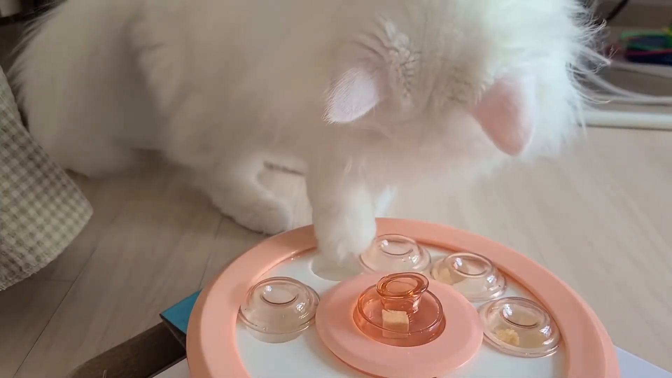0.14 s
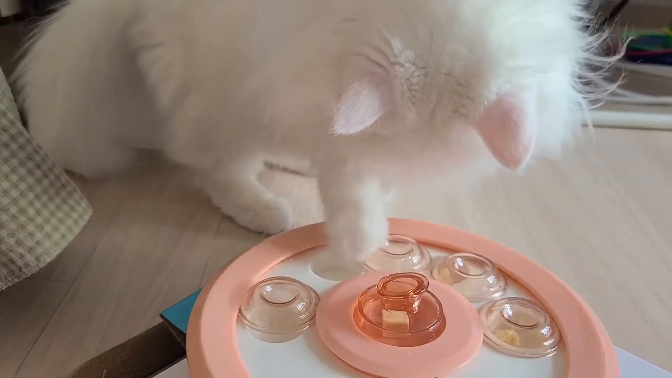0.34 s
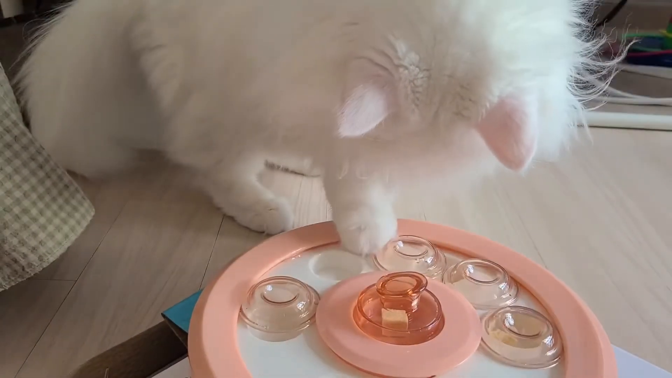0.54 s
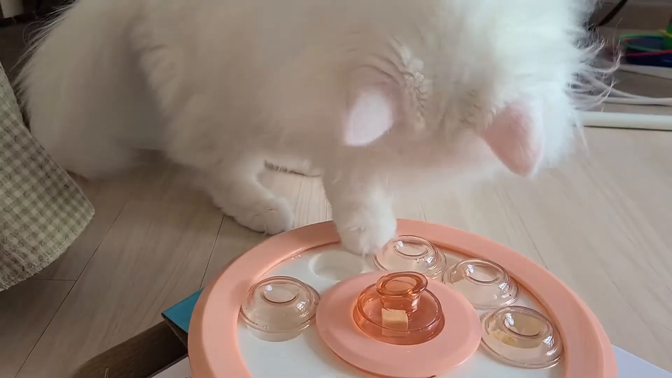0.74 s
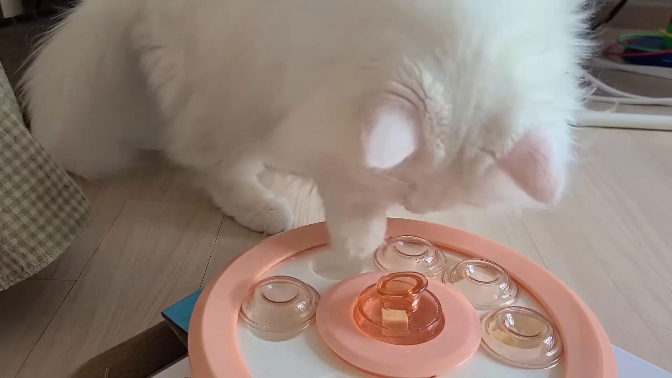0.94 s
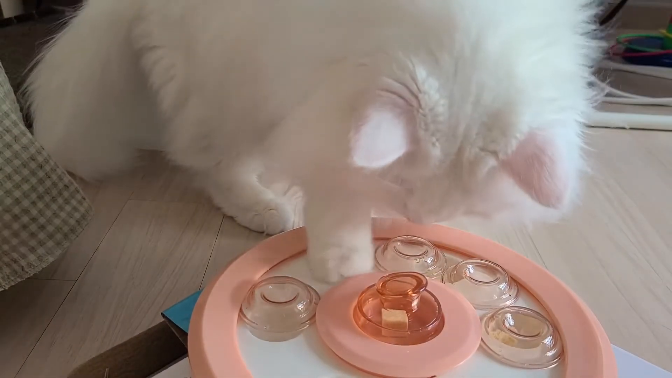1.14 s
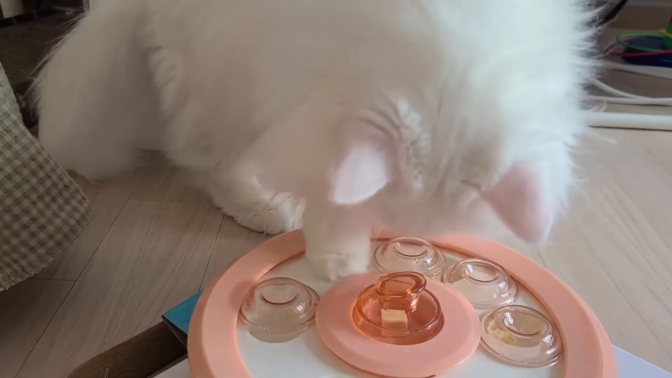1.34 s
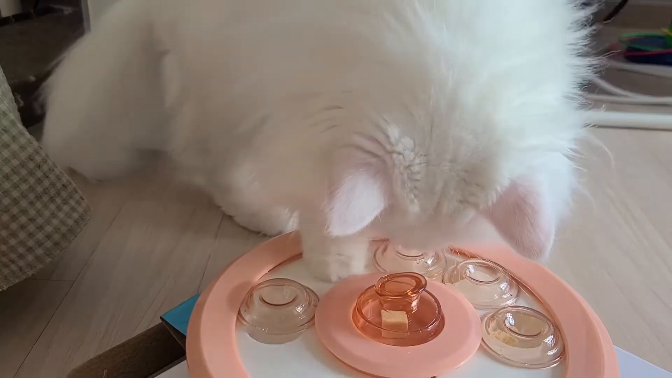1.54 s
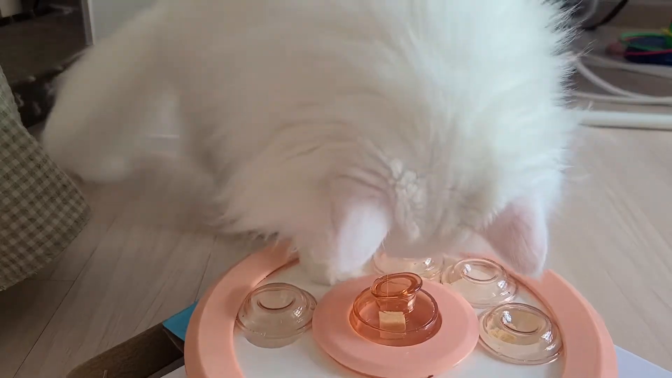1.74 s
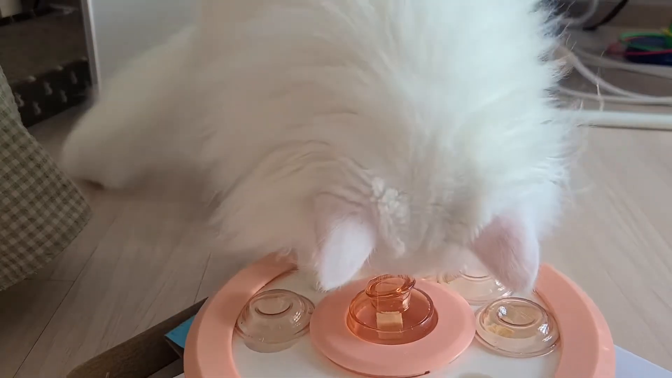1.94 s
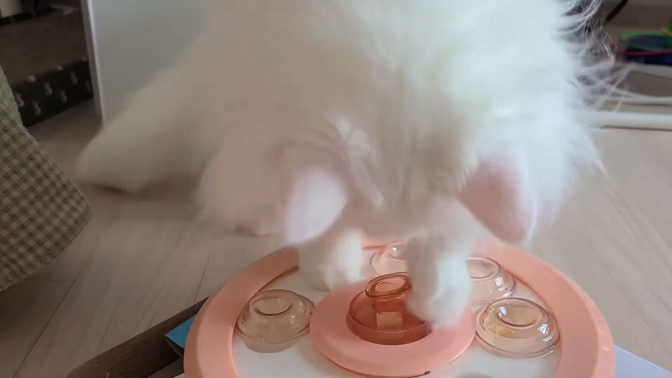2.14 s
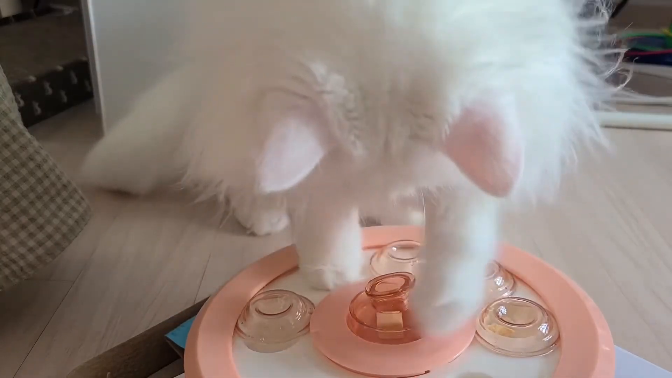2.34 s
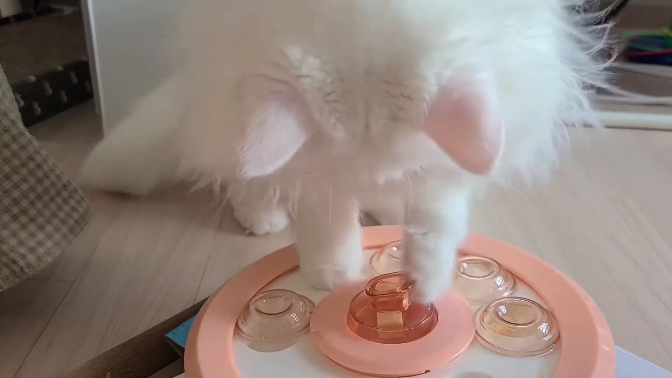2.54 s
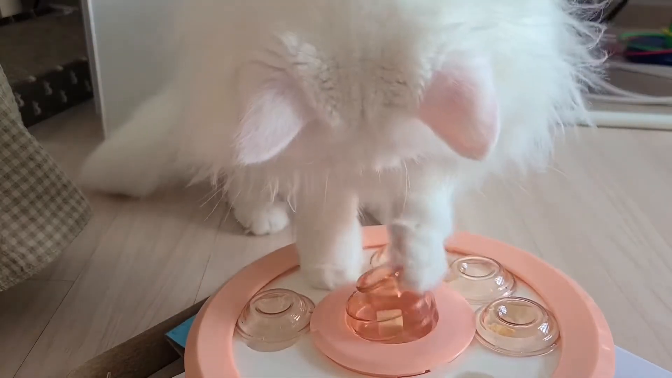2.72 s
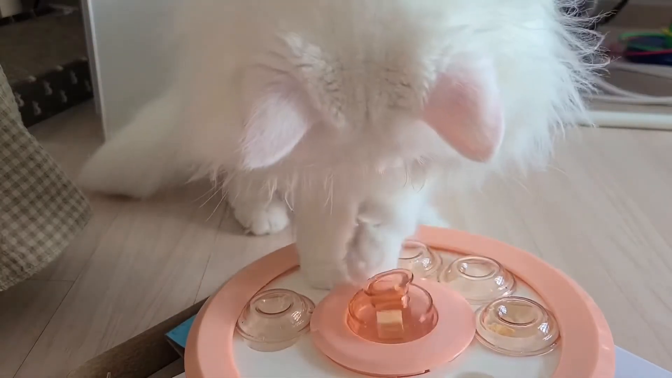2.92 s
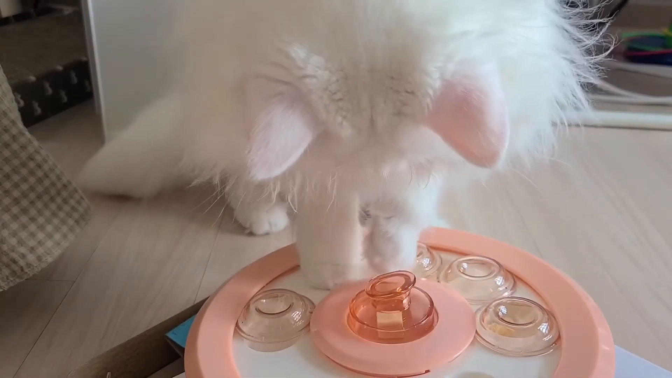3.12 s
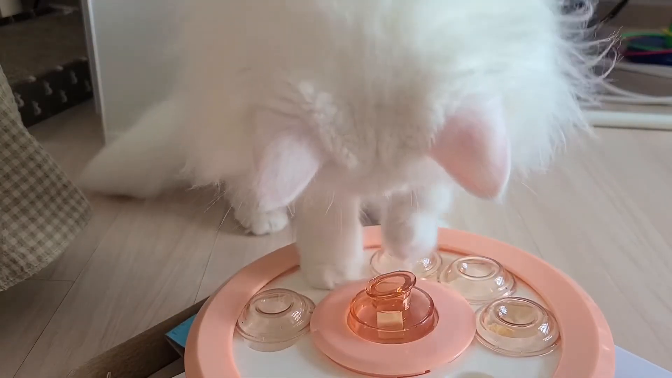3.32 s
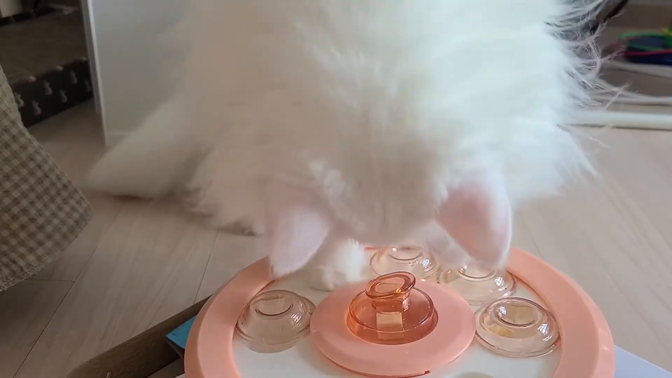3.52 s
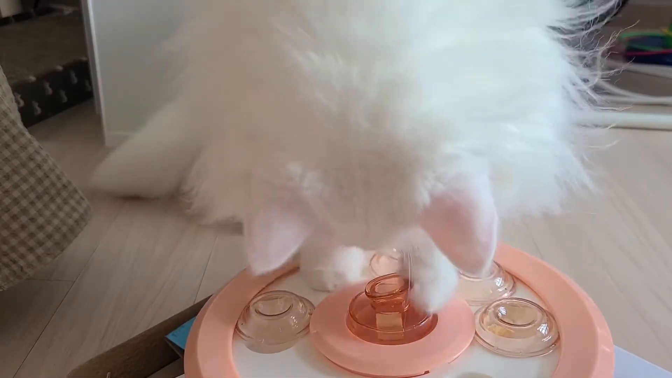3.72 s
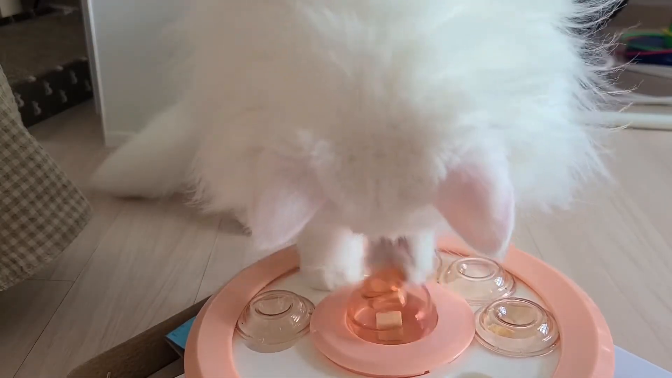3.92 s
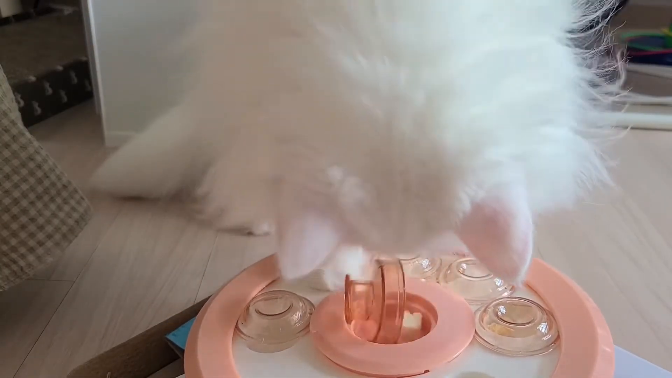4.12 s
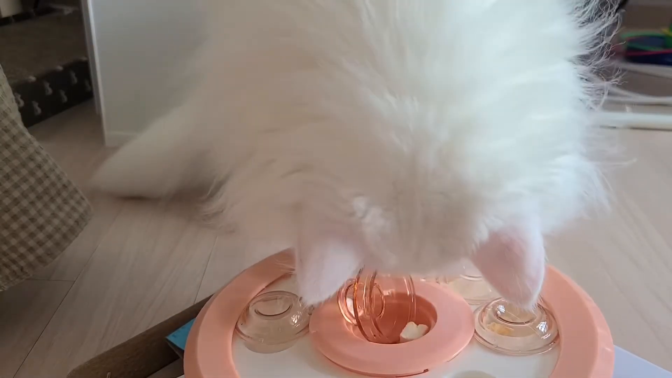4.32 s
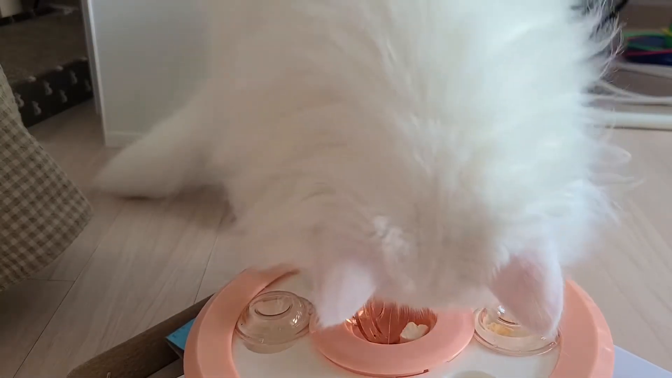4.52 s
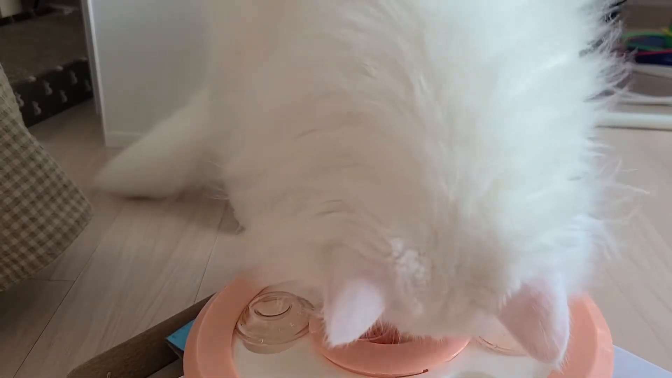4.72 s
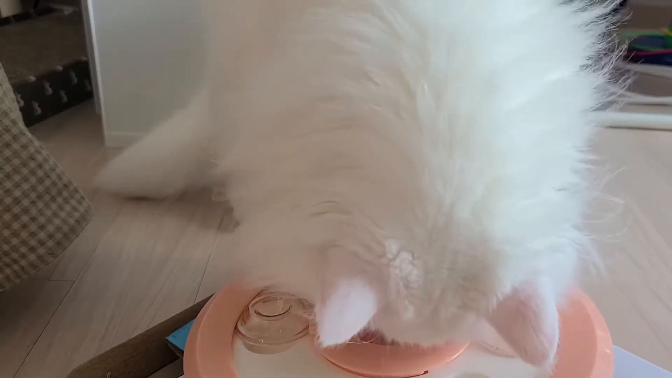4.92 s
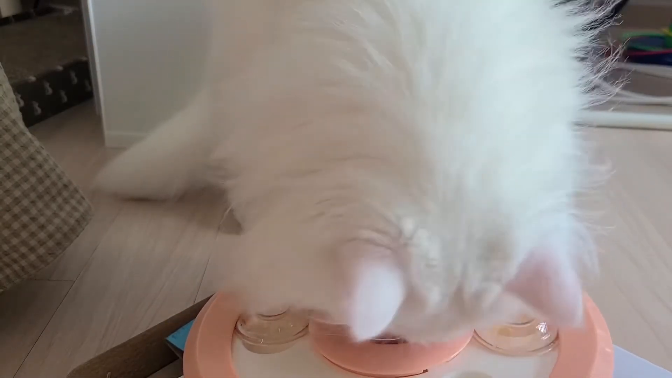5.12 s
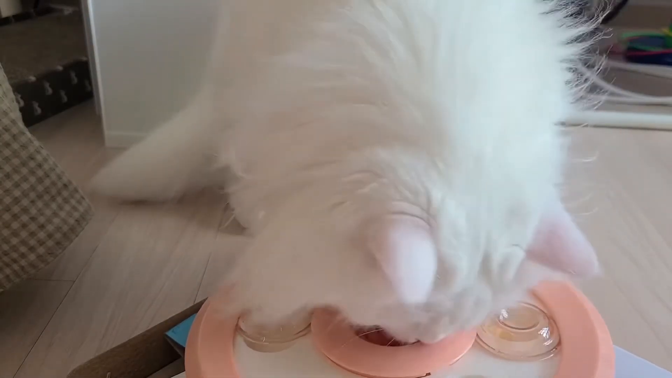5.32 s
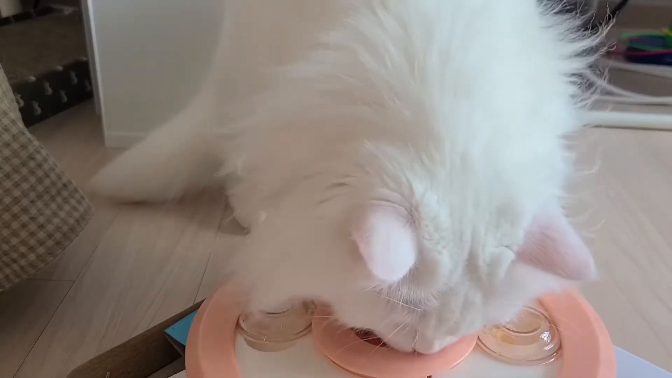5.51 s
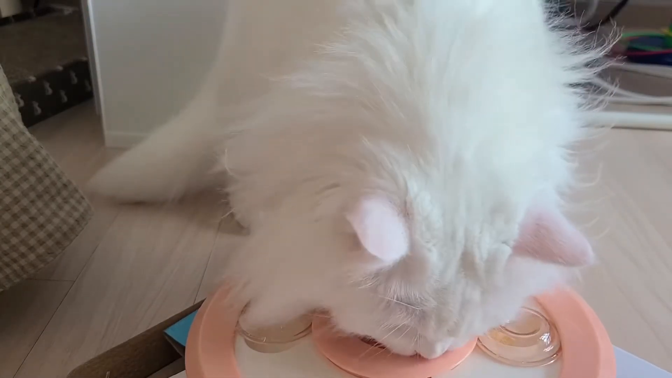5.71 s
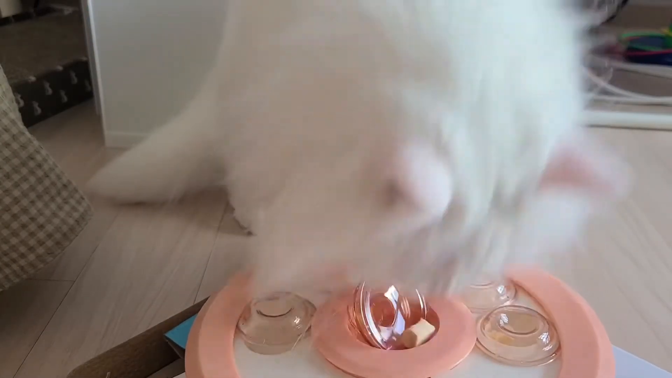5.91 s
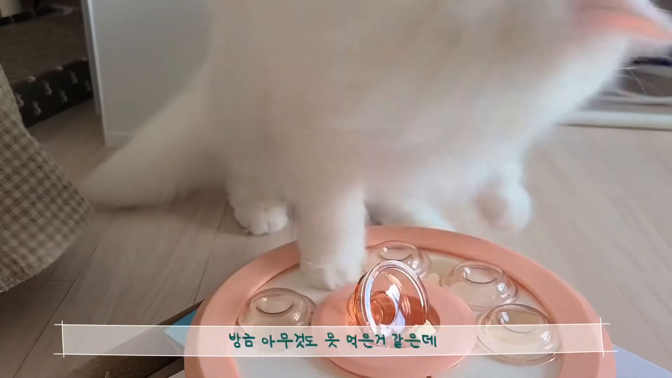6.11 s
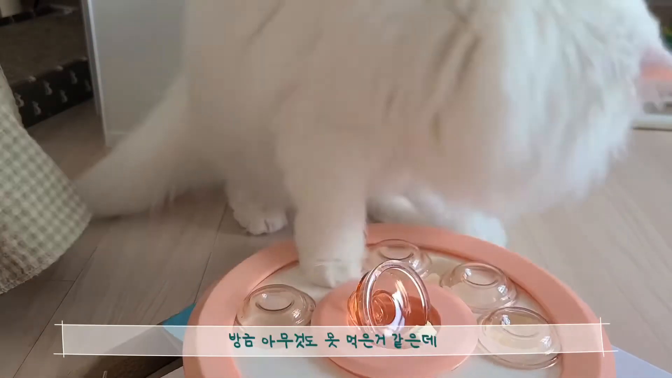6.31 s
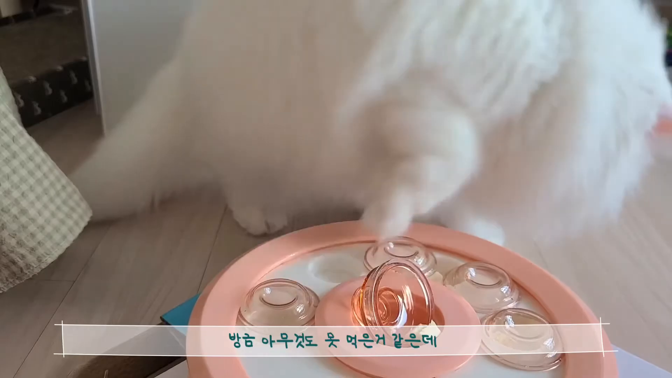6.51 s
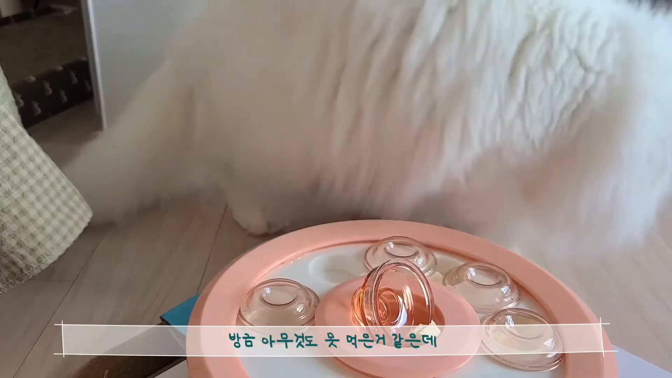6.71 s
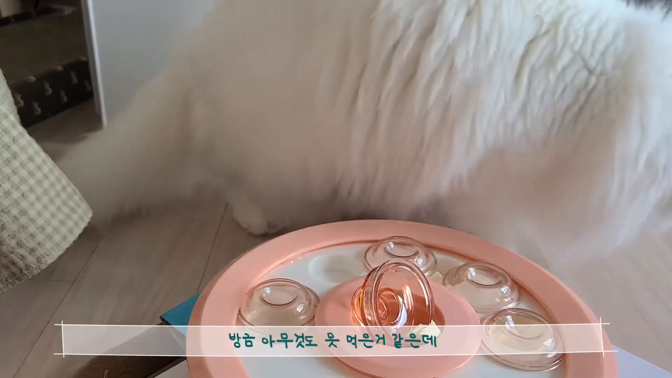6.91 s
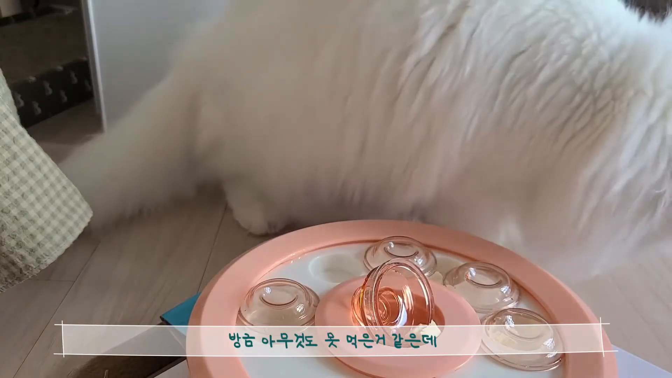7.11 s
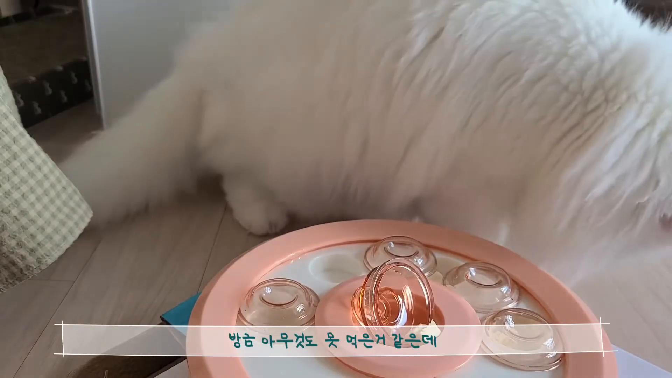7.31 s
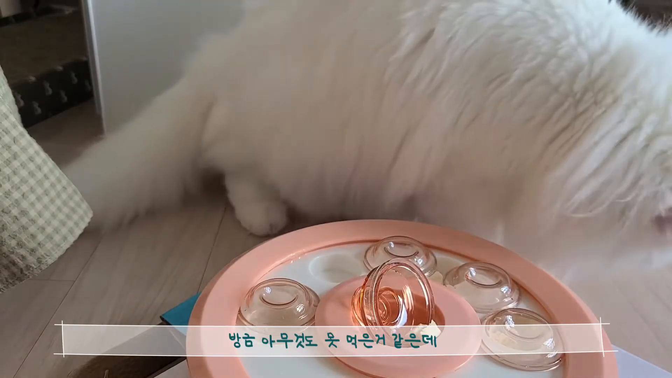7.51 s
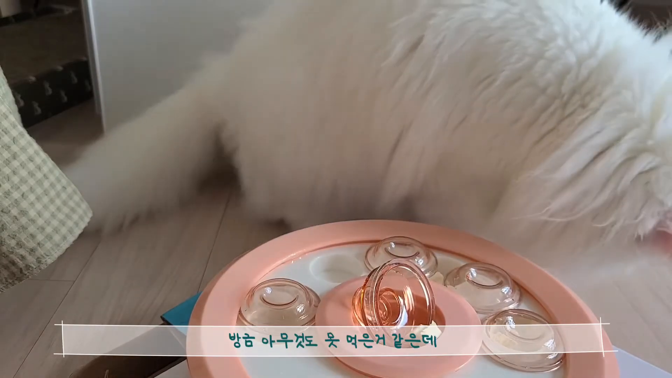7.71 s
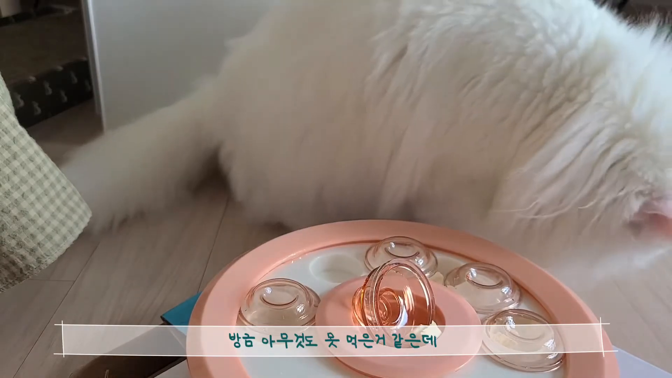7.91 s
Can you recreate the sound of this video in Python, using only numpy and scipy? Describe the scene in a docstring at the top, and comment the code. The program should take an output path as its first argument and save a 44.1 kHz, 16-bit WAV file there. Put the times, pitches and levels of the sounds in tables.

```python
"""A small quiet room with a wooden floor: a cat paws and noses a plastic puzzle feeder close to a phone.
The tray rocks and taps, the domed lid flips over with a rattle, a loose treat ticks, fur brushes the plastic.
Knocks, nudges, claw clicks and scuffs ring one modal shell; ticks are paired sines, paw steps shaped noise.
A short echo made of decaying noise follows, over room noise, faint hum, whines and hiss."""
import sys
import numpy as np
from scipy import signal
from scipy.fft import rfft, irfft, next_fast_len
from scipy.io import wavfile

SR = 44100
rng = np.random.default_rng(int(sys.argv[2]) if len(sys.argv) > 2 else 0)


def master_out(mix):
    """Clip the mix to full scale and print it as 16-bit PCM to the path in sys.argv[1]."""
    frames = np.transpose(np.atleast_2d(mix))
    ceiling = np.clip(frames, -1, 1)
    pcm = np.round(ceiling * 32767).astype(np.int16)
    wavfile.write(sys.argv[1], SR, pcm)


N = 350595  # samples in the scene
RING = 13230  # samples that one contact may ring for
t = np.arange(RING) / SR


def undb(db):
    """Decibels to gain."""
    return 10 ** (np.asarray(db) / 20)


def unit(x):
    """Scale to rms 1."""
    return x / np.sqrt(np.mean(x ** 2))


def fade(t60):
    """Free decay, 60 dB in t60 seconds."""
    return np.exp(-np.log(1000) * t / t60)


def add(out, start_s, x):
    """Mix x into out from start_s, cut off at the end of the scene."""
    i = int(start_s * SR)
    out[:, i:i + x.shape[-1]] += x[..., :N - i]


def colour(x, points):
    """Causal minimum-phase filter through (Hz, dB) points, made by folding the cepstrum."""
    n = 2 * next_fast_len(x.shape[-1] // 2 + RING // 8)
    point_hz, point_db = np.transpose(points)
    bin_hz = np.maximum(np.arange(n // 2 + 1) * SR / n, 1)
    gain = undb(np.interp(np.log(bin_hz), np.log(point_hz), point_db))
    cepstrum = irfft(np.log(gain))
    # doubling the first half and dropping the second gives the causal phase
    cepstrum[1:n // 2] *= 2
    cepstrum[n // 2 + 1:] = 0
    response = np.exp(rfft(cepstrum))
    return irfft(rfft(x, n) * response)[..., :x.shape[-1]]


def pair(n, side):
    """Noise at two microphones: a shared part, plus and minus a part coloured by side (Hz, dB)."""
    mid, diff = rng.standard_normal((2, n))
    signs = np.array([[1], [-1]])
    return unit(mid + signs * colour(diff, side))


def hum(waver=0.22):
    """Mains hum and a distant fan: sines whose level and phase wander slowly."""
    # Each row: frequency in Hz, rms level in dB before the waver.
    hum_tones = [(119.8, -67.5), (180, -80), (274.5, -79), (360, -79.5), (479.5, -80.5)]
    time = np.arange(N) / SR
    knots = np.linspace(0, N / SR, 24)
    out = np.zeros((2, N))
    for hz, db in hum_tones:
        size = np.interp(time, knots, rng.standard_normal(len(knots)))
        drift = np.interp(time, knots, rng.standard_normal(len(knots)))
        lag = np.array([[0], [hz / 600]])  # radians between the two ports
        wave = np.sin(2 * np.pi * hz * time + drift * hz / 300 + lag)
        out += np.sqrt(2) * undb(db) * (1 + waver * size) * wave
    return out


def whines():
    """Faint whines in the room noise: white noise through narrow resonances."""
    # Each row: frequency in Hz, width in Hz, rms level in dB.
    bands = [(860, 49, -76.5), (1114, 25, -82), (1416, 70, -82.5), (2460, 27, -90), (3470, 90, -89),
             (5930, 120, -84), (6830, 48, -84), (7600, 77, -91)]
    out = np.zeros((2, N))
    for hz, width_hz, db in bands:
        b, a = signal.iirpeak(hz, hz / width_hz, fs=SR)
        out += undb(db) * unit(signal.lfilter(b, a, rng.standard_normal((2, N))))
    return out


def background(air_db=-60.0, hiss_db=-75.0):
    """Low room rumble, partly shared by the ports, and separate microphone hiss, with hum and whines."""
    # Colour of the steady room noise. Each row: frequency in Hz, relative level in dB per Hz.
    air_colour = [(20, -10), (50, 6), (90, -4), (135, -4.5), (230, -12.5), (350, -15), (650, -21),
                  (850, -23), (1300, -29.5), (2200, -34), (5000, -40.5), (15000, -53)]
    # Colour of the hiss. Each row: frequency in Hz, relative level in dB per Hz.
    hiss_colour = [(2000, -17.5), (3400, -3.5), (4800, -12.5), (6000, 1), (7600, -0.5), (9000, -17),
                   (10500, -12.5), (12200, -5), (14500, -14.5), (16000, -19.5)]
    air = unit(colour(pair(N, [(60, -19), (200, -13), (600, -2.5), (1500, 1.5)]), air_colour))
    hiss = unit(colour(rng.standard_normal((2, N)), hiss_colour))
    return undb(air_db) * air + undb(hiss_db) * hiss + hum() + whines()


def room(x, echo_db=-7.5, t60_low=0.23, t60_high=.24, build_s=0.0059, early_db=-7.5, early_t60=0.051):
    """Floor and furniture answer first as sparse reflections; the walls' decaying noise builds up after."""
    # Colour of the echo from floor and walls. Each row: frequency in Hz, gain in dB.
    walls = [(100, -11), (200, 9), (450, 3.5), (800, 4.5), (1400, -7), (2500, -6.5), (5000, -3),
             (9000, -2.5), (15000, -2)]
    noise = pair(RING, [(150, -17.5), (500, -6), (1200, 3), (3000, 4.0)])
    low = signal.sosfilt(signal.butter(2, 1800, fs=SR, output="sos"), noise)
    high = signal.sosfilt(signal.butter(2, 1800, "high", fs=SR, output="sos"), noise)
    build = 1 - np.exp(-(t / build_s) ** 2)
    late = (low * fade(t60_low) - high * fade(t60_high)) * build
    sparse = (rng.random(RING) < .04) * (t > .002)  # nothing in the first 2 ms
    near = pair(RING, [(300, -3.5), (2000, -7.5)]) * sparse * fade(early_t60)
    echo = (undb(echo_db) * unit(late) + undb(early_db) * unit(near)) / np.sqrt(RING)
    return x + signal.fftconvolve(x, colour(echo, walls), axes=1)[:, :N]


def upper_modes(t60, count=70):
    """The dense high modes that one contact happens to excite; the highest fade first."""
    place, size, phase, side = rng.random((4, count, 1))
    hz = 1000 + 14000 * (np.arange(count)[:, None] + place) / count
    u = t[:RING // 4]
    # t60 holds at 3 kHz
    rings = size * np.exp(-np.log(1000) * u / t60 * (hz / 3000) ** .3)
    lag = (side - .5) * np.minimum(hz / 1200, np.pi)
    ports = [(rings * np.sin(2 * np.pi * (hz * u + phase) + e * lag)).sum(0) for e in (1, -1)]
    return np.pad(np.array(ports), [(0, 0), (0, RING - len(u))])


def shell(spot_hz=1450, over_hz=2500, spot_db=1.0, over_db=-9.5, spot_t60=.018, over_t60=0.029,
          vary_db=1.14, detune=.012, ear_db=1.02, crack_db=-5.5, crack_t60=0.0095,
          upper_db=-7.5, upper_t60=0.031, contact_s=0.00052):
    """One contact: a crack, two brief tones of the struck spot and the shell's modes, weighted anew."""
    # The shell, damped by paw and floor, with a few longer rings.
    # Each row: frequency in Hz, level in dB, t60 in seconds.
    modes = [(367, -22, 0.019), (446.2, -21.5, .13), (498, -10, 0.041), (502.7, -23.5, .15),
             (745, -15.5, 0.046), (845, -6, 0.027), (1060, -17.5, 0.11), (1143, -15, 0.12),
             (1165, -5.5, 0.017), (1405, -22.5, .16), (1451, 0.5, 0.02), (1550, -22, 0.12),
             (1610, -21.5, .15), (1770, -2.5, .02), (1894, -13, 0.046), (2080, -10, 0.011),
             (2510, -8, 0.018), (2608, -22, 0.1), (3240, -15.5, 0.039), (3930, -17.5, .02),
             (4843, -23, 0.014), (5590, -21, 0.016), (7300, -28.5, .025), (8457, -33, 0.021)]
    # Colour of the crack and the dense upper modes at contact. Each row: frequency in Hz, gain in dB.
    crack_colour = [(30, -56), (110, -25.5), (185, -9), (280, -16.5), (460, -4), (700, -4), (1500, 3.5),
                    (2100, -7.5), (3200, -8), (5000, -15.5), (8000, -23.5), (10000, -29.5), (13500, -31),
                    (16000, -39)]
    over_level_db = over_db - 20 * np.log10(over_hz / 2000)
    spot = [(spot_hz, spot_db, spot_t60), (over_hz, over_level_db, over_t60)]
    hz, db, t60 = np.transpose(list(modes) + spot)[:, :, None]
    share, bend, side, phase = rng.standard_normal((4, len(hz), 1))
    # the paw's grip shifts the broad, damped modes more than the long rings
    swing = 2 * np.pi * hz * (1 + detune * bend * t60.min() / t60) * t
    rings = undb(db + vary_db * share) * fade(t60)
    # short waves reach the two ports unequally
    side = side * np.minimum(hz / 1500, 2)
    ports = []
    for e in (1, -1):
        wave = np.sin(swing + phase + e * 0.45 * side)
        ports.append((rings * undb(e * ear_db * side) * wave).sum(0))
    body = np.array(ports)
    burst = pair(RING, [(300, -11.5), (1500, -0.5), (4000, 0.5)]) * fade(crack_t60)
    crack = colour(burst, crack_colour)
    upper = colour(upper_modes(upper_t60), crack_colour)
    onset = 1 - np.exp(-t / contact_s)
    return (unit(body) + undb(crack_db) * unit(crack) + undb(upper_db) * unit(upper)) * onset


def contact(spot_hz, weight_db, edge_db, attack_s=.007, free_t60=1.0):
    """One blow, levelled over its attack; weight thumps through tray and floor, a hard edge adds treble."""
    snap_db = 5 + 1.2 * edge_db  # the top snap grows with the hardness of the edge
    tone = [(40, -18.5), (150, .3 * weight_db), (280, 0.59 * weight_db - 3), (420, 0.91 * weight_db + 1.0),
            (700, 0.5 * weight_db), (1300, 0), (2300, -0.04),
            (4200, edge_db - 1.5), (5500, edge_db + 1.5), (7500, edge_db), (11000, snap_db)]
    # second tone of the struck spot, scattered by .14 octave
    over_hz = 2388 * 2 ** (.14 * rng.standard_normal())
    # a paw leaning on the toy damps its ring
    hit = shell(spot_hz, over_hz) * fade(free_t60 * undb(-weight_db))
    attack_rms = np.sqrt(np.mean(hit[:, :int(attack_s * SR)] ** 2))
    return colour(hit / attack_rms, tone)


def scuffs(slips_per_s=900, scatter_db=5.0):
    """Paw and fur drag over the toy: tiny uneven slips swell and die away, each one tapping the shell."""
    # Each row: start in seconds, length in seconds, level in dB before brightening, brightness in dB.
    drags = [(1.049, 0.343, -82.5, 13), (1.738, 0.083, -70.5, 8.5), (1.869, 0.0052, -41.5, -2),
             (2.582, 0.0085, -53.5, -32), (2.88, 0.0081, -42.5, -12), (2.901, 0.042, -37.5, -13.5),
             (3.633, 0.025, -63, -4), (3.963, 0.034, -55, -22.5), (5.614, 0.046, -69, 11.5),
             (5.715, 0.06, -70, 5.5), (6.162, 0.0719, -68, 9.5), (6.369, 0.0107, -54, -5),
             (6.401, 0.022, -57, 1), (7.629, 0.048, -65, 8)]
    out = np.zeros((2, N))
    for start_s, length_s, db, bright_db in drags:
        n = int(length_s * SR)
        count = int(length_s * slips_per_s) + 2
        slips = np.zeros(n)
        sizes = undb(scatter_db * rng.standard_normal(count))
        slips[rng.integers(1, n - 1, count)] = sizes * rng.choice([-1, 1], count)
        swell = np.hanning(n) ** .5
        rub = signal.fftconvolve(shell(), (slips * swell)[None], axes=1)
        rub = rub / np.sqrt(np.sum(rub ** 2) / (2 * n))
        add(out, start_s, undb(db) * colour(rub, [(1500, 0.00048), (5000, bright_db)]))
    return out


def steps(t60=0.13, press_s=0.0017):
    """A padded paw set down on tray or floor gives a slow, dull thud of shaped noise."""
    # Each row: start in seconds, level in dB before the envelope, pitch in Hz.
    paws = [(1.772, -55.5, 377), (1.875, -50, 420), (2.891, -49, 187.3), (5.11, -47, 183.3),
            (5.86, -43.5, 193.6), (6.387, -39, 397), (7.303, -63.5, 550), (7.655, -57, 618)]
    out = np.zeros((2, N))
    envelope = fade(t60) * (1 - np.exp(-t / press_s))
    for start_s, db, hz in paws:
        shape = [(hz / 3, -30), (hz * .8, -5), (hz, 0), (hz * 1.25, -8), (hz * 2.5, -18), (hz * 8, -50)]
        thud = unit(colour(rng.standard_normal(RING), shape))
        add(out, start_s, undb(db) * thud * envelope)
    return out


def ticks():
    """A small hard piece, treat or lid, rings in a close pair of high modes."""
    # Each row: start in seconds, frequency in Hz, level in dB, t60 in seconds.
    pieces = [(0.3427, 8160, -36, 0.037), (1.875, 3830, -46, 0.016), (2.109, 3640, -60.5, .03),
              (2.111, 2300, -58.5, .025), (2.706, 5300, -65, .025), (2.889, 5960, -50.5, .05),
              (2.992, 10350, -69.5, 0.023), (3.958, 5520, -54, .06), (4.008, 3710, -33.5, 0.018),
              (4.074, 5494, -24.5, .04), (4.711, 4950, -48, 0.021), (5.079, 4950, -46.5, .022),
              (5.112, 4700, -45, 0.03), (5.859, 3112, -44, 0.064)]
    out = np.zeros((2, N))
    for start_s, hz, db, t60 in pieces:
        phase = rng.uniform(0, 2 * np.pi, (2, 1))
        first = np.sin(2 * np.pi * hz * t) * fade(t60)
        second = 0.54 * np.sin(2 * np.pi * hz * 1.04 * t + phase) * fade(t60 / 2)
        add(out, start_s, undb(db) * (first + second))
    return out


def claws():
    """A claw tip catches the plastic: a light, hard contact gives a thin, bright click."""
    # Each row: start in seconds, level in dB before the contact's tone.
    catches = [(0.323, -54.5), (1.722, -75.5), (1.819, -74.5), (2.706, -73), (5.703, -75), (7.627, -65.5)]
    out = np.zeros((2, N))
    for start_s, db in catches:
        add(out, start_s, undb(db) * contact(spot_hz=1190, weight_db=-1, edge_db=22.5))
    return out


def nudges(count=3, spot_hz=850, weight_db=17.5):
    """Low, heavy, quiet pushes of tray against floor, and count fainter stirs in each resting stretch."""
    # Each row: start in seconds, level in dB before the contact's tone, edge hardness in dB.
    pushes = [(0.239, -54, 8.5), (0.812, -56.5, 6), (0.8337, -55, 7.5), (1.264, -62.5, 4),
              (1.535, -66.5, 2), (1.778, -59, 7.5), (2.589, -54.5, 1.5), (3.939, -56.5, -10.5),
              (4.65, -62, -7), (4.711, -55.5, 7), (5.007, -54.5, -19), (5.288, -65, -2.5),
              (6.254, -62, 8.5)]
    # Stretches in which a resting paw keeps the tray stirring. Each row: start and end in seconds.
    stretches = [(1.0, 1.85), (3.6, 3.95), (5.2, 5.8)]
    out = np.zeros((2, N))
    for start_s, db, edge_db in pushes:
        add(out, start_s, undb(db) * contact(spot_hz, weight_db, edge_db))
    for begin_s, end_s in stretches:
        for start_s in rng.uniform(begin_s, end_s, count):
            stir_db = -67.5 + 2.5 * rng.standard_normal()
            add(out, start_s, undb(stir_db) * contact(spot_hz, weight_db, edge_db=1.5))
    return out


def knocks():
    """Lid and tray knock together, plastic on plastic, at spots of differing pitch."""
    # Each row: start in seconds, level in dB before the contact's tone, pitch of the struck spot in Hz,
    # weight behind it in dB, edge hardness in dB.
    blows = [(0.329, -34, 1170, 2.5, 2.5), (0.342, -23, 1448, -9.5, 3.5), (0.3521, -32.5, 1370, 0, 8.5),
             (1.8748, -40.5, 950, 12.5, -2), (1.896, -48, 1850, -3, -22), (2.641, -50, 1130, 4, -17),
             (2.671, -47, 860, 3, -25), (2.89, -25, 1530, -6, -8.5), (2.9437, -34, 1455, -10, -12),
             (2.97, -41.5, 1160, 1, -10), (2.9923, -36.5, 1420, -2.5, -11.5), (3.001, -37.5, 1560, 5, -5.5),
             (3.985, -47.5, 1120, 14, -12), (4.0025, -40.5, 1580, 9, -5), (4.008, -23, 1490, -3, -8),
             (4.0495, -29.5, 1510, -1, -10.5), (4.065, -31.5, 1480, 3.5, 0), (4.074, -10, 1520, -6.5, 3),
             (4.1035, -17, 1430, -7, -9), (4.115, -27.5, 1160, 8, -3), (4.188, -37, 1070, 6.5, -6),
             (4.193, -28.5, 930, 1.5, -3.5), (4.227, -26, 1480, 4.5, 4), (4.2411, -22.5, 1182, 1.5, 0.5),
             (4.8796, -42, 1120, -12, 1.5), (4.891, -48.5, 1830, -9.5, -4), (5.081, -51.5, 930, 12, 7),
             (5.1063, -42.5, 1750, 10.5, 0), (5.112, -34, 1450, 5, -2), (5.168, -53, 1447, 4.5, -5),
             (5.852, -45, 1490, 9, -6), (5.8586, -34, 1625, 9, -1), (5.864, -35, 1130, 12.5, -6.5),
             (5.871, -34.5, 1140, -7.5, -5), (5.8852, -33, 1190, 2.5, -4), (6.383, -34.5, 1282, 11, 3.5),
             (6.398, -44, 1233, 7.5, 11)]
    out = np.zeros((2, N))
    for start_s, db, spot_hz, weight_db, edge_db in blows:
        add(out, start_s, undb(db) * contact(spot_hz, weight_db, edge_db))
    return out


def scene():
    """The toy in its room, heard up close through two slightly unlike ports, over the background."""
    # How the two microphone ports hear the toy. Each row: frequency in Hz, left minus right in dB.
    ports = [(120, -2), (350, 0), (700, 1.5), (1400, -0.5), (2800, -2), (5600, -3.5), (10000, -1),
             (14000, -3)]
    toy = room(scuffs() + steps() + ticks() + claws() + nudges() + knocks())
    heard = []
    for x, e in zip(toy, (1, -1)):
        heard.append(colour(x, [(hz, e * db / 2) for hz, db in ports]))
    return background() + np.array(heard)


def record(dry, top_hz=16000):
    """The phone clips at full scale, then a steep low-pass cuts the top."""
    low_pass = signal.ellip(8, .2, 70, top_hz, fs=SR, output="sos")
    return signal.sosfilt(low_pass, np.clip(dry, -1, 1))


dry = scene()
out = record(dry)
master_out(out)
```